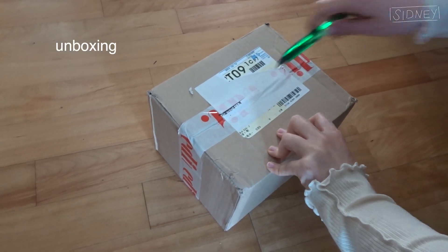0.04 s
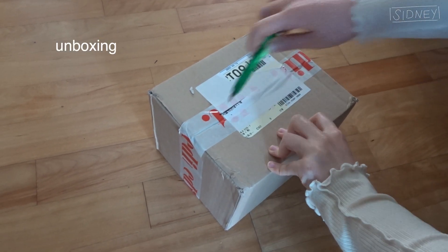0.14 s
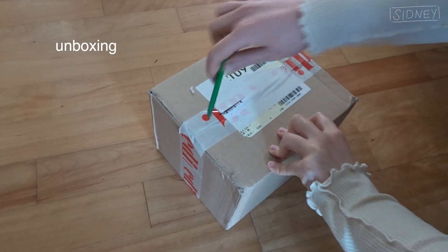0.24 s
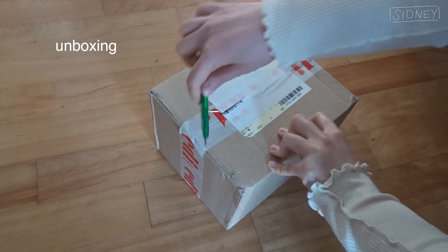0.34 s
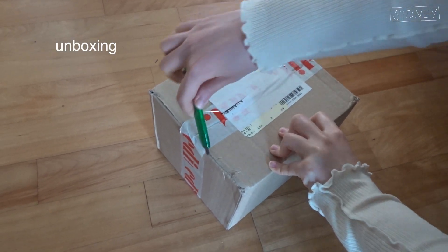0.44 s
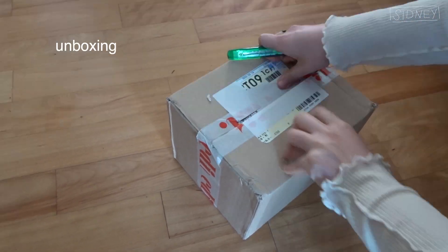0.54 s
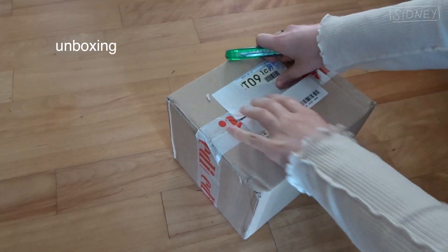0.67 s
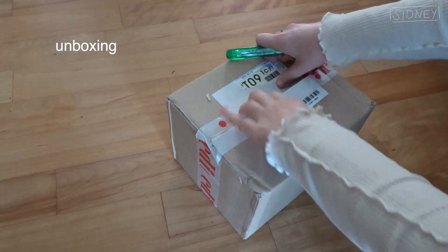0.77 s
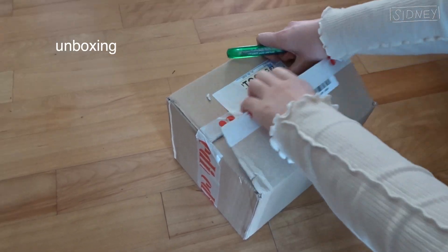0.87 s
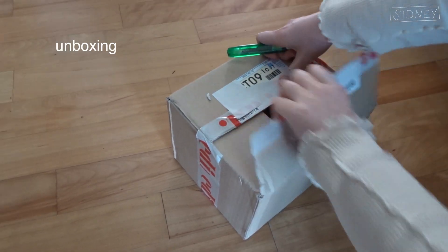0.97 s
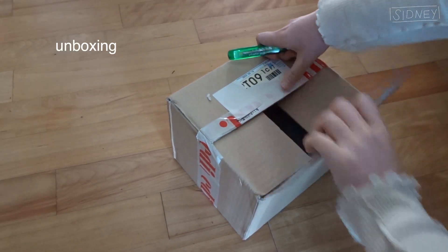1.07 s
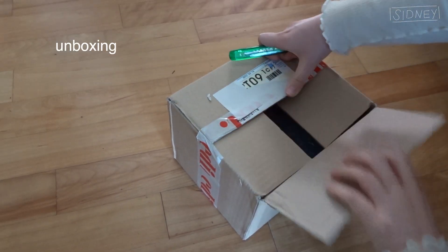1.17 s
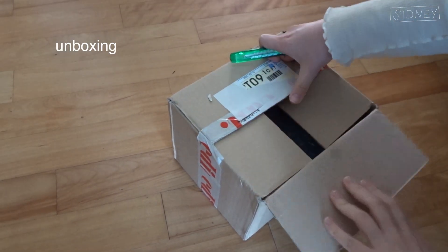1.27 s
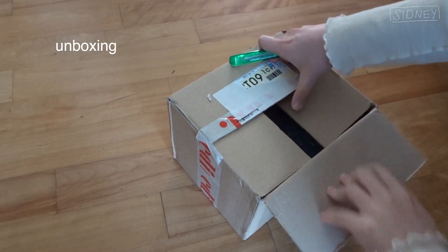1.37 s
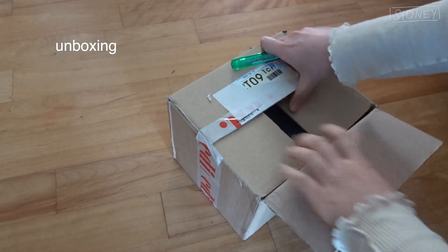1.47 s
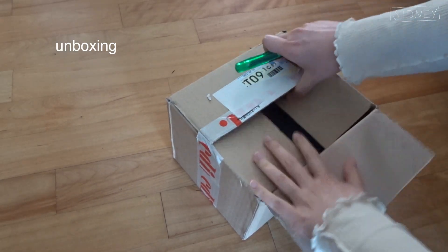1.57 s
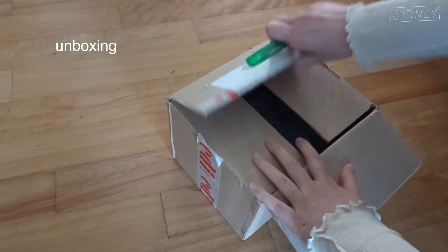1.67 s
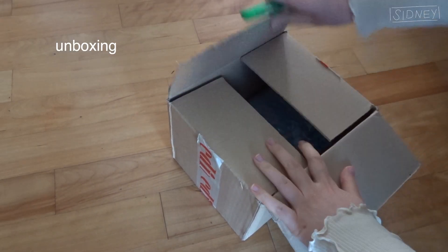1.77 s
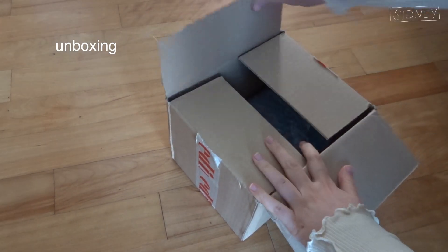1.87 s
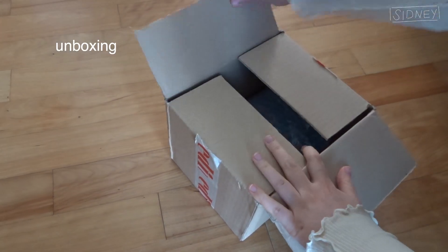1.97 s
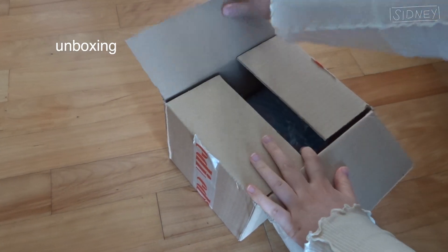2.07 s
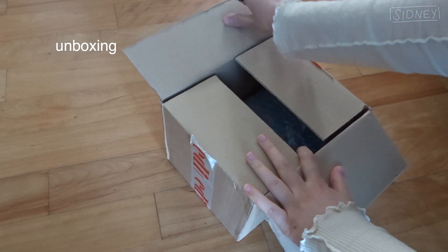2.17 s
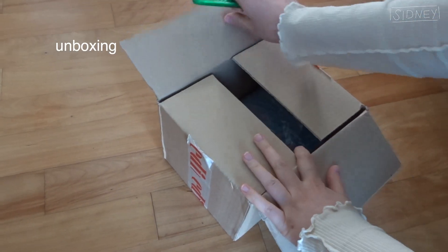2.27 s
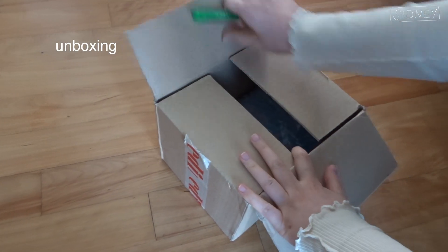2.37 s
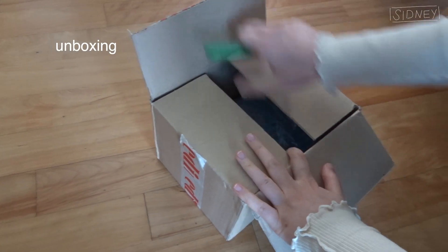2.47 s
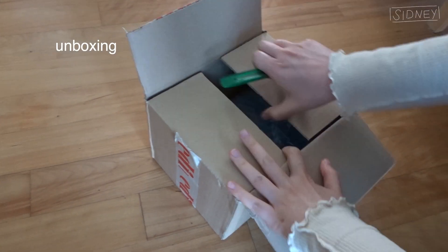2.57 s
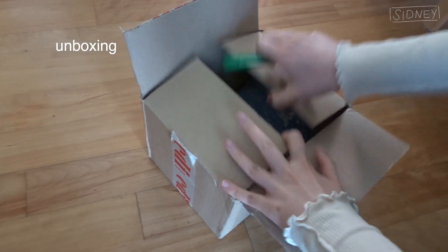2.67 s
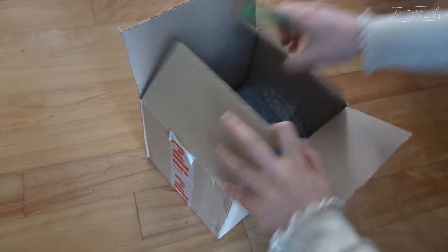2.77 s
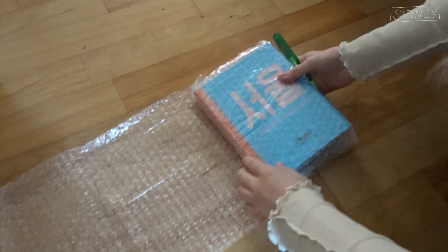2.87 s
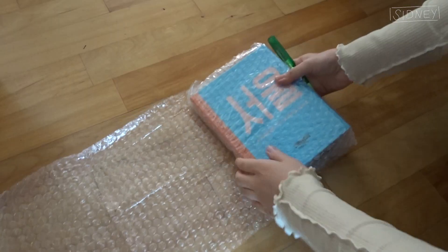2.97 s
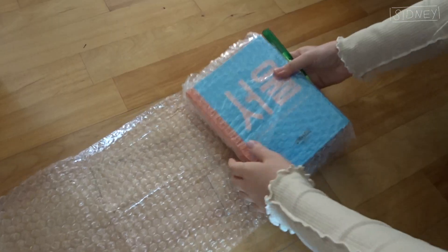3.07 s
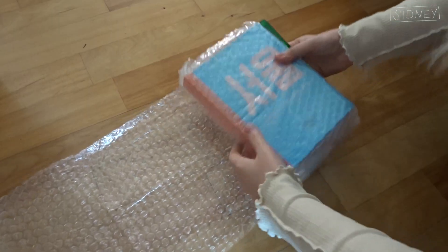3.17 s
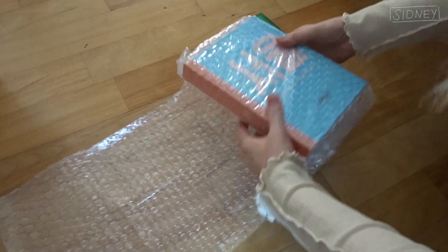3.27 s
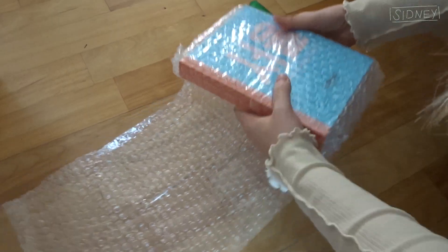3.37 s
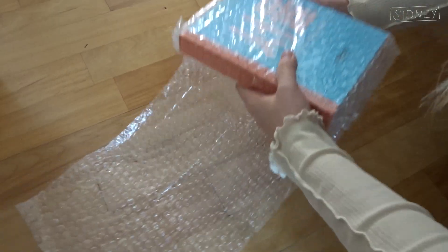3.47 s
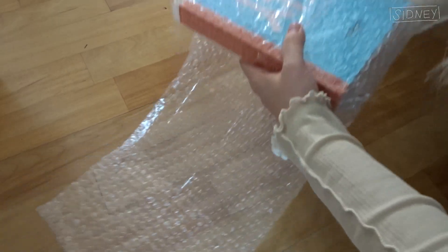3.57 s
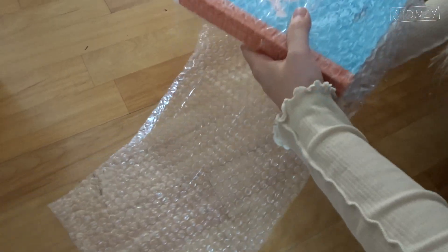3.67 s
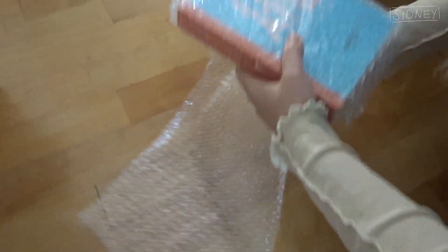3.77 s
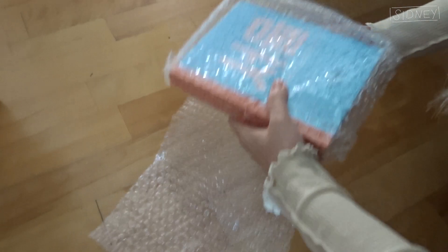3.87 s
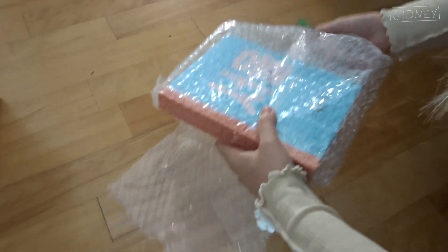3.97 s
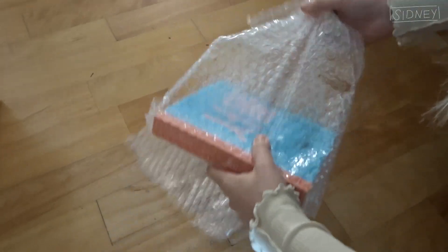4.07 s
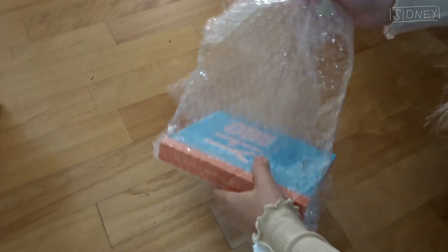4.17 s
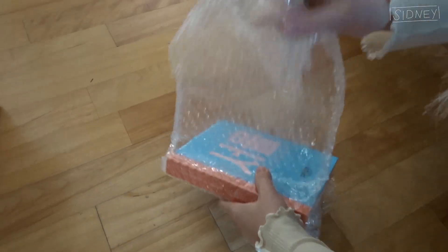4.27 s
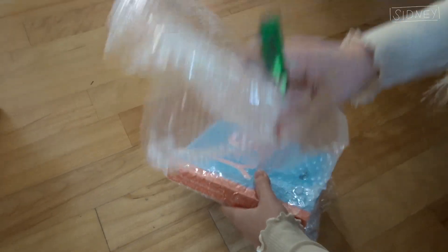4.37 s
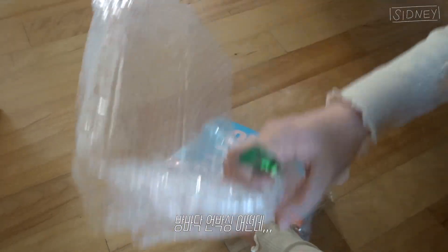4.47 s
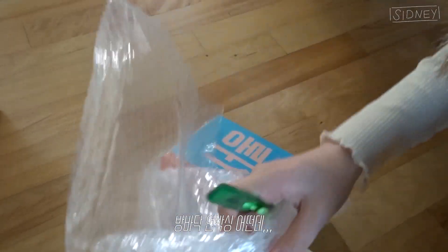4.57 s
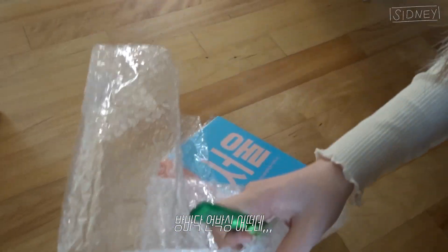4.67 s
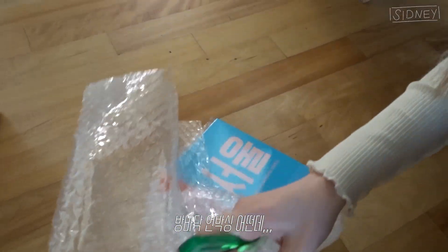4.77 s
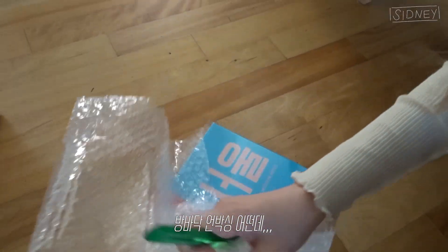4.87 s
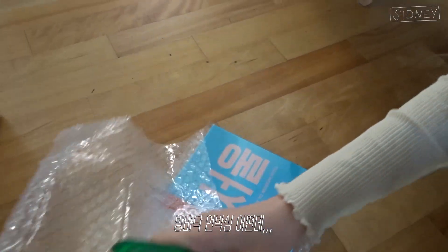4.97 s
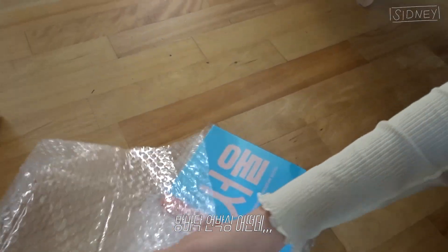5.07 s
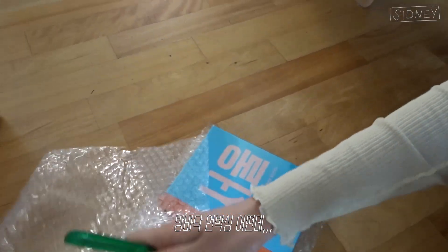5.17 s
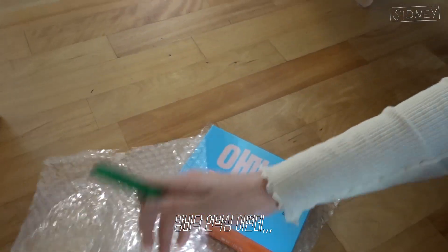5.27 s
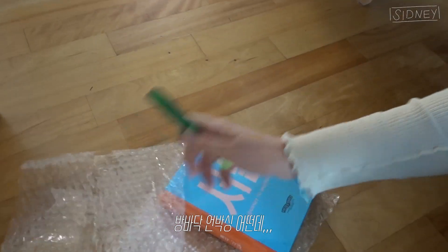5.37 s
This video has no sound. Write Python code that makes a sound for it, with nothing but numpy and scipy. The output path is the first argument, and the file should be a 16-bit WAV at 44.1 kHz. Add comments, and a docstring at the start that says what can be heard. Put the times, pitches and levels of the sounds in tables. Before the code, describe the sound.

A close stereo microphone in a small room with a wooden floor, faint hiss and a short tail. For the first half second there is almost nothing but very light rubbing and a tiny tick. At 0.6 s handling jumps in: dry rasping on hollow cardboard, with a knock and tape cracks at 0.8 s. From 1.0 to 1.5 s a thin, faint squeak wavers and steps higher as a flap turns. A knock at 1.5 s precedes the box's loudest cluster of cracks and hollow knocks at 1.65 s, with a soft floor thud; another knock comes at 1.95 s. Softer scuffs follow at 2.3 and 2.6 s. Around 2.8 s cardboard yields to bubble wrap: a burst of sharp snaps at 3.03 s, scattered crackles, then much denser, brighter crinkling from 3.7 s, strongest to about 4.15 s. A hard snap and parcel thump land at 4.87 s, before uneven rustling swells to the end.

```python
"""A small room with a wooden floor: close by, hands open a taped cardboard box, then unroll bubble wrap.
Rubbing is dense random clicks, coloured and, for the hollow box, rung through its modes; knocks and scuffs
drive the same modes. Tape and plastic snap as short noise bursts, and a fold squeaks as a wavering sine. The
sheet rustles with dense creases and crackles with small snaps; the floor thuds under faint room hiss. The level
of the rubbing and rustle jumps abruptly near 0.6 and 3.7 s; near 2.8 s the box gives way to the sheet."""
import sys
import numpy as np
from scipy import signal
from scipy.fft import rfft, irfft, next_fast_len
from scipy.io import wavfile
from scipy.ndimage import uniform_filter1d

SR = 44100
rng = np.random.default_rng(int(sys.argv[2]) if len(sys.argv) > 2 else 0)


def dump_mix(stems):
    """Bounce the given channels to the path in sys.argv[1] as a 16-bit WAV at rate SR."""
    frames = np.atleast_2d(stems).T  # one column per channel
    limited = np.clip(frames, -1, 1)  # hard clip at full scale
    pcm = np.round(limited * 32767).astype(np.int16)
    wavfile.write(sys.argv[1], SR, pcm)


def makeup_ratio(level_db):
    """Linear amplitude ratio for a level in decibels (20 dB per factor of ten)."""
    decades = np.asarray(level_db, float) / 20
    return 10 ** decades


N = 239496

# blows on the box, later on the wrapped parcel:
# (time [s], peak [dB], pitch of the blow [Hz], spread [octaves], t60 of the contact [s])
KNOCKS = [(0.597, -43.5, 800, 0.49, 0.0059), (0.76, -47, 710, 0.83, 0.012), (0.814, -25, 470, 0.43, 0.012),
          (0.833, -33, 432, 0.17, 0.01), (0.852, -39, 516, 0.36, 0.008), (1.124, -45, 543, 0.65, 0.0074),
          (1.475, -26, 500, 0.51, 0.0051), (1.606, -38, 800, 0.43, 0.008),
          (1.619, -34.5, 815, 0.28, 0.0092), (1.634, -30, 745, 0.8, 0.0053),
          (1.645, -22, 940, 0.69, 0.0044), (1.686, -43, 816, 0.62, 0.008),
          (1.749, -39.5, 950, 0.58, 0.0068), (1.767, -41, 608, 0.35, 0.01), (1.816, -41, 1030, 0.65, 0.019),
          (1.934, -36, 816, 0.36, 0.014), (1.952, -24, 1000, 0.34, 0.017), (2.064, -46, 820, 0.2, 0.022),
          (2.806, -45.5, 610, 0.21, 0.01), (3.031, -28.5, 950, 0.26, 0.034), (3.044, -28, 940, 0.43, 0.027),
          (3.357, -55.5, 437, 0.5, 0.053), (4.302, -47, 396, 0.16, 0.095), (4.616, -49.5, 398, 0.19, 0.039),
          (4.873, -20, 1250, 1.9, 0.043)]
# rustle of the sheet, one list a stretch: (time [s], crinkle level [dB], fullness against the crinkle [dB])
WRAP_RUB = [
    [(2.804, -57.5, -3.5), (2.92, -56, -2), (2.945, -46.5, -15.5), (3.025, -48.5, -8.5),
     (3.035, -36, -13.5), (3.105, -53, -12), (3.163, -54.5, -11.5), (3.324, -49.5, -18.5),
     (3.348, -50.5, -23), (3.357, -42.5, -21), (3.43, -45, -20), (3.475, -45, -23), (3.5, -38.5, -15.5),
     (3.52, -43, -12.5), (3.54, -46, -12.5), (3.601, -54, -13.5), (3.727, -51.5, -18)],
    [(3.731, -41, -8.5), (3.79, -38, -13.5), (3.834, -30.5, -12.5), (3.89, -37, -14.5), (3.97, -34, -9),
     (4.023, -36.5, -6.5), (4.054, -30.5, -13), (4.127, -34, -7), (4.164, -42, -9), (4.25, -43, -14),
     (4.315, -40.5, -13.5), (4.37, -42.5, -16), (4.47, -43.5, -17), (4.555, -42, -12.5),
     (4.585, -38, -13.5), (4.63, -39.5, -12), (4.785, -45, -11), (4.86, -40, -12), (4.876, -35, -5),
     (4.924, -40, -10.5), (4.96, -48, -7), (5.02, -44.5, -10.5), (5.085, -34.5, -12), (5.18, -51, -7.5),
     (5.263, -32, -10.5), (5.355, -46, -9.5), (5.43, -38, -5.5)],
]
BOX_GONE_S = 2.9  # later blows fall on the solid parcel, and later snaps are of plastic


def evened(x):
    """Normalisation: scales a signal to unit rms."""
    return x / np.sqrt(np.mean(x ** 2) + 1e-20)


def read(points, hz):
    """Interpolates a spectrum along logarithmic frequency, on which hearing spaces pitch."""
    f, value = np.transpose(points)
    return np.interp(np.log(hz + 1), np.log(f + 1), value)


def add(mix, s, sound):
    """Superposition: adds a sound into the mix from time s [s] on."""
    part = mix[..., round(s * SR):][..., :sound.shape[-1]]
    part += sound[..., :part.shape[-1]]


def follow(stretches):
    """Envelope: level and low share [dB] at every sample, silent outside the table."""
    s, level_db, low_db = np.vstack(stretches).T
    t = np.arange(N) / SR
    return np.interp(t, s, level_db, -200, -200), np.interp(t, s, low_db)


def grains(per_s, spread_db, clump_db, clump_s):
    """Shot noise: slips or creases in clumps, a few large, each at its own place (middle and side rows)."""
    size = makeup_ratio(spread_db * np.minimum(rng.exponential(1, N), 4)) * rng.choice([-1., 1.], N)
    clumps = evened(uniform_filter1d(rng.standard_normal(N), max(round(clump_s * SR), 2)))
    struck = rng.random(N) < per_s / SR
    clicks = evened(size * struck * makeup_ratio(clump_db * clumps))
    return np.array([clicks, clicks * rng.standard_normal(N)])


def patchy(x, patch_db):
    """Spectral modulation: areas of the surface speak in turn, each with its own colour."""
    z = signal.stft(x, SR, nperseg=256)[2]
    patches = rng.standard_normal(z[0].T.shape)  # time by frequency
    patches = uniform_filter1d(uniform_filter1d(patches, 8, 0), 7, 1)
    return signal.istft(z * makeup_ratio(patch_db * evened(patches).T), SR, nperseg=256)[1][:, :N]


def stroke(x, colour, gains):
    """Source-filter shaping: colours the grains, then weights their middle, low and high bands."""
    size = next_fast_len(N)
    hz = np.fft.rfftfreq(size, 1 / SR)
    low = 1 / (1 + (hz / 1300) ** 6)
    high = 1 / (1 + (5000 / (hz + 1)) ** 6)
    spectrum = rfft(x, size) * makeup_ratio(read(colour, hz))
    parts = [evened(irfft(spectrum * share, size)[:, :N]) for share in (1 - low - high, low, high)]
    return sum(part * gain for part, gain in zip(parts, gains))


def ring(force, detune=1):
    """Modal synthesis: a force convolved with the box's decaying sines, shifted together by detune."""
    # resonances of the hollow box: (frequency [Hz], relative level [dB], t60 [s])
    modes = [(168, 3, 0.082), (444, 6, 0.033), (526, 2.5, 0.038), (659, -1.5, 0.11), (859, -2, 0.037),
             (912, -3, 0.052), (1314, 2.5, 0.012), (1506, -15, 0.074), (1748, -3, 0.038), (2150, -4, 0.02),
             (2600, -39, 0.011), (3380, -37, .012)]
    t = np.arange(SR // 4) / SR
    body = sum(makeup_ratio(db - 60 * t / t60) * np.sin(2 * np.pi * hz * detune * t) for hz, db, t60 in modes)
    return signal.oaconvolve(np.atleast_2d(force), body[None], axes=1)[:, :force.shape[-1]]


def burst(hz, octaves, t60, noise, scatter_db):
    """Impact excitation: a sharp tick, then dying noise, band-passed about hz; peak 1."""
    t = np.arange(len(noise)) / SR
    force = makeup_ratio(scatter_db - 60 * t / max(t60, .002)) * noise
    force[0] = 1
    edges = hz * 2 ** (max(octaves, .2) * np.array([-1, .6]))  # reaches further down than up
    edges = np.clip(edges, 40, .45 * SR)
    out = signal.sosfilt(signal.butter(2, edges, "bandpass", fs=SR, output="sos"), force)
    return out / abs(out).max()


def box_rub():
    """Friction: slips of skin and blade, heard directly and through the modes, and rattle after blows."""
    # rubbing on the box, one list a stretch: (time [s], rasp level [dB], boom against the rasp [dB])
    rubbing = [
        [(0.0, -64.5, -4), (0.15, -76.5, -6), (0.4, -77.5, -5.5), (0.457, -62.5, -20), (0.5, -72, -10),
         (0.592, -65, -18)],
        [(0.596, -50, -1.5), (0.64, -57, 2), (0.758, -66.5, -6), (0.79, -63, 2), (0.809, -54.5, 2),
         (0.86, -52, -2), (0.914, -47.5, -5), (0.977, -55.5, -7.5), (1.058, -52.5, -3), (1.121, -55, -6.5),
         (1.216, -57, -10.5), (1.28, -57.5, -14), (1.33, -59.5, -5.5), (1.418, -62.5, -9.5), (1.46, -50.5, -6),
         (1.582, -55.5, 0), (1.641, -42.5, 0), (1.706, -50.5, 0.5), (1.823, -52.5, -6), (1.87, -60.5, -11),
         (1.898, -60, -3), (1.902, -53, 3.5), (2.034, -55, -8), (2.087, -56.5, -2.5), (2.201, -58, -4),
         (2.265, -67, -2), (2.31, -64, 4.5), (2.345, -53, -5), (2.39, -56, -7), (2.433, -66.5, -7.5),
         (2.554, -65, -3), (2.615, -43.5, -11.5), (2.64, -53, -11), (2.697, -59.5, -8), (2.803, -61.5, -5)],
    ]
    # spectrum of the rubbing: (frequency [Hz], relative density [dB per Hz])
    colour = [(47, -69), (80, -67), (161, -32), (259, -31.5), (628, -5.5), (710, -7.5), (821, -6),
              (1120, -14), (1760, -1.5), (2210, -7.5), (3330, -5.5), (5350, -7), (11000, 1), (14300, -37),
              (22000, -120)]
    slips = grains(10000., spread_db=0.5, clump_db=-0.7, clump_s=0.0048)
    level_db, boom_db = follow(rubbing)

    # every blow shakes flaps and tape, which rattle on and die away
    rattle_power, t = np.zeros(N), np.arange(SR // 2) / SR
    for s, db, *_ in KNOCKS:
        if s < BOX_GONE_S:
            add(rattle_power, s, makeup_ratio(db - 20 - 60 * t / 0.15) ** 2)  # t60 0.15 s
    rasp = np.sqrt(makeup_ratio(level_db) ** 2 + rattle_power)
    boom = np.sqrt(makeup_ratio(level_db + boom_db) ** 2 + makeup_ratio(9) ** 2 * rattle_power)
    hiss = rasp * makeup_ratio(-4.5)

    surface = slips + makeup_ratio(-16.5) * evened(ring(slips))
    return stroke(patchy(surface, patch_db=2.5), colour, (rasp, boom, hiss))


def knocks():
    """Impact: a blow excites the box's modes near its own pitch; the solid parcel only thumps."""
    out = np.zeros(N)
    for (s, db, hz, octaves, t60), noise in zip(KNOCKS, rng.standard_normal((len(KNOCKS), 8192))):
        if s > BOX_GONE_S:
            sound = burst(hz, octaves, t60, noise, scatter_db=-5)
        else:
            # the modes shift a little as flaps and hands move
            sound = ring(burst(hz, octaves, t60, noise, scatter_db=-13.5), 1 + 0.024 * noise[0])[0]
        add(out, s, makeup_ratio(db) * sound / abs(sound).max())
    return out


def scuffs():
    """Sliding friction: flaps scuff past each other, a soft swell near one pitch rung out by the box."""
    # (time [s], length of the swell [s], peak [dB], pitch of the force [Hz], spread [octaves])
    slides = [(0.594, 0.027, -43, 800, 0.27), (0.625, 0.036, -47, 760, 0.24), (2.161, .18, -56, 870, .2),
              (2.119, 0.19, -57, 1800, .2), (0.876, 0.05, -39.5, 1980, 0.42), (1.9, 0.034, -57, 660, 0.46),
              (2.057, 0.061, -48, 794, 0.18), (2.31, 0.065, -37, 1690, 0.18),
              (2.321, 0.056, -39, 882, 0.22), (2.569, 0.025, -50, 700, 0.61),
              (2.598, 0.037, -34.5, 950, 0.25)]
    out = np.zeros(N)
    for (s, length, db, hz, octaves), noise in zip(slides, rng.standard_normal((len(slides), 8192))):
        swell = np.sin(np.pi * np.minimum(np.arange(len(noise)) / SR / length, 1)) ** 2
        sound = ring(swell * burst(hz, octaves, 0.63, noise, scatter_db=0))[0]
        add(out, s, makeup_ratio(db) * sound / abs(sound).max())
    return out


def squeak():
    """Stick-slip: the fold squeaks as the flap turns, a thin whistle wavering in pitch and level."""
    # one list a whistle: (time [s], frequency [Hz], level before flutter [dB])
    whistles = [
        [(1.015, 2480, -58), (1.055, 2723, -59), (1.09, 2780, -65), (1.12, 2920, -53), (1.165, 3000, -64)],
        [(1.17, 3980, -70), (1.225, 4250, -61), (1.265, 4000, -63), (1.31, 4130, -54), (1.37, 4270, -65),
         (1.42, 4140, -59), (1.485, 3730, -61)],
    ]
    out = np.zeros(N)
    for rows in whistles:
        s, hz, db = np.transpose(rows)
        t = np.arange(s[0], s[-1], 1 / SR)
        wobble, flutter = (evened(uniform_filter1d(rng.standard_normal(len(t)), 300)) for _ in range(2))
        turns = np.cumsum(np.interp(t, s, hz) * (1 + 0.0037 * wobble)) / SR
        level = np.sqrt(2) * makeup_ratio(np.interp(t, s, db) + 2.5 * flutter)
        add(out, s[0], level * np.sin(2 * np.pi * turns) * signal.windows.tukey(len(t), .15))
    return out


def snaps():
    """Sudden release: short cracks, each at its own place; tape rings a little longer than plastic."""
    # loudest snaps of tape and plastic:
    # (time [s], peak before the tick [dB], pitch [Hz], spread [octaves], left against right [dB])
    loudest = [(0.4631, -41.5, 6200, 1.4, 1), (0.595, -33.5, 3380, 1.24, 2), (0.7867, -37, 9900, 0.18, -1),
               (0.8162, -40, 1410, 0.93, 6), (0.826, -20.5, 3270, 0.17, -2), (0.829, -27.5, 3680, 0.74, -3),
               (0.834, -22, 4530, 2.3, -1), (1.1214, -33, 5150, 1.5, -5), (1.316, -39, 4070, 0.54, -13),
               (1.474, -28.5, 2200, 0.45, -12), (1.62, -21.5, 3300, 1.1, -4), (1.6328, -23.5, 5060, 1.1, 2),
               (1.6441, -13, 4840, 0.83, 3.5), (1.6473, -16.5, 4900, 0.71, -7), (1.6529, -26, 2970, 1.4, 8),
               (1.6883, -33, 3550, 0.96, 0), (1.7326, -33, 5690, 1.2, -5), (1.7483, -28, 3100, 1.8, -4),
               (1.8177, -32.5, 2190, 0.86, -4), (1.9038, -36, 4720, 1.3, -3), (1.9525, -19, 1770, 0.79, -2),
               (1.9561, -29, 1490, 0.53, 1), (2.1023, -41, 3200, 0.36, -4), (2.1467, -43, 3250, 0.17, -17),
               (2.4008, -38, 2300, 1.2, 4), (2.4993, -44.5, 6500, 0.66, 0), (2.612, -33, 3470, 1.2, -4),
               (2.8073, -37, 2300, 0.54, -6), (2.98, -27, 2500, 1.7, -5), (2.993, -26, 5400, 1.2, 0),
               (3.0007, -23, 5210, 1.2, -4), (3.0273, -19, 3600, 1.4, -1), (3.0316, -11.5, 3780, 1.43, 0),
               (3.0445, -11.5, 4200, 1.7, -3), (3.1303, -30, 4750, 1.3, 0), (3.1455, -33, 6240, 0.23, 2),
               (3.2895, -32, 3450, 0.46, 0), (3.3239, -25.5, 5370, 1.1, -5), (3.3325, -26.5, 4300, 0.9, -2),
               (3.3551, -21, 5150, 1, -3), (3.3593, -21.5, 3850, 0.75, 2), (3.3883, -24, 4450, 0.54, -2),
               (3.3942, -19.5, 7440, 0.91, -1), (3.4289, -16.5, 6700, 0.92, -3),
               (3.432, -15.5, 5530, 0.81, 1), (3.5222, -21, 3670, 0.37, -3), (3.534, -20, 4460, 0.9, -1),
               (3.4978, -25, 3340, .8, -4), (3.8085, -20, 7500, 0.68, 3), (3.829, -21, 3200, 1.1, -2),
               (3.849, -12.5, 4540, 0.37, 2), (3.8587, -23, 3800, 1.3, -4), (3.9712, -13.5, 3630, 0.5, -5),
               (4.049, -11.5, 4830, 1.04, -8), (4.0552, -16, 4300, 0.68, -6),
               (4.0802, -11.5, 5580, 1.4, -2), (4.0914, -17, 5000, 1.9, -4), (4.239, -18.5, 6700, 0.84, 3),
               (4.2747, -22, 6300, 1.4, 1), (4.3378, -21, 5470, 1.2, -3), (4.4412, -26.5, 6950, 1, -6),
               (4.574, -20, 5200, 0.75, -2.6), (4.7693, -25.5, 3820, 0.74, -6),
               (4.8745, -11, 2800, 0.68, 1), (5.0822, -21.5, 4100, 0.29, 0), (5.2686, -22.5, 4820, 1.6, 9)]
    rows = [*loudest, *crackles()]
    out = np.zeros((2, N))
    for (s, db, hz, octaves, pan_db), noise in zip(rows, rng.standard_normal((len(rows), 2, 1024))):
        t60 = 0.0042 if s > BOX_GONE_S else 0.014  # plastic, tape [s]
        right = 0.83 * noise[0] + 0.59 * noise[1]  # partly like the left
        pair = np.array([burst(hz, octaves, t60, row, scatter_db=-4.0) for row in (noise[0], right)])
        # the bright edge of a snap
        pair += makeup_ratio(-10) * burst(9300, 1.0, 0.0025, noise[1], scatter_db=7.5)
        add(out, s, makeup_ratio(db + pan_db * np.array([[.5], [-.5]])) * pair)
    return out


def crackles():
    """Random point process: snap rows for the many small creases, as strong as the rustle."""
    per_s, slot = 110, 200  # mean rate while the sheet rustles; at most one crackle a slot [samples]
    lowest_hz, highest_hz = 2800, 7860
    chance, size, pitch, spread, place = rng.random((N // slot, 5)).T
    at = np.arange(len(chance)) * slot + (190 * place).astype(int)
    level_db = follow(WRAP_RUB)[0][at]
    peak_db = level_db + 8 - 3.5 * np.log(0.049 + size)  # a few stand far above the rustle
    hz = lowest_hz * (highest_hz / lowest_hz) ** pitch
    pan_db = -1.2 + 9 * (np.roll(size, 1) - .5)
    rows = np.transpose([at / SR, peak_db, hz, 0.61 + 1.44 * spread, pan_db])
    return rows[(chance < per_s * slot / SR) & (level_db > -90)]


def wrap_rub():
    """Crumpling noise: thousands of creases click every second in the plastic sheet."""
    # spectrum of the rustle: (frequency [Hz], relative density [dB per Hz])
    colour = [(59, -85), (100, -48.5), (207, -39), (437, -11.5), (687, -6), (758, -7), (1570, 0.5),
              (2110, 1), (3250, 4.5), (9970, -0.5), (11000, 0.5), (14300, -55), (22000, -120)]
    creases = grains(8000., spread_db=2.0, clump_db=1.46, clump_s=0.0071)
    level_db, full_db = follow(WRAP_RUB)
    # the hiss lies 4 dB under a crinkle of -43.5 dB and misses a share of each swell
    hiss_db = level_db - 4 - 0.086 * np.maximum(level_db + 43.5, -15)
    gains = makeup_ratio([level_db, level_db + full_db, hiss_db])
    return stroke(patchy(creases, patch_db=1.21), colour, gains)


def thuds():
    """Structure-borne sound: the floorboards boom briefly and unevenly under the heavier blows."""
    # (time [s], peak [dB], pitch [Hz], t60 [s])
    booms = [(0.598, -69, 171, 0.18), (0.82, -68, 150, 0.48), (1.126, -61, 173, 0.14), (1.2, -81, 100, .4),
             (1.477, -55.5, 153, 0.3), (1.552, -63, 178, 0.24), (1.641, -41.5, 200, 0.14),
             (1.689, -51, 168, 0.31), (1.935, -52, 180, 0.25), (4.874, -46, 161, 0.19)]
    out = np.zeros(N)
    for (s, db, hz, t60), noise in zip(booms, rng.standard_normal((len(booms), SR // 2))):
        add(out, s, makeup_ratio(db) * burst(hz, 0.44, t60, noise, scatter_db=-12))
    return out


def air():
    """Stationary noise: faint hiss of the room, stepping down 12 dB at 2.9 s (middle and side rows)."""
    # spectrum of the quiet room: (frequency [Hz], relative density [dB per Hz])
    colour = [(35, -59), (60, -27), (167, -7), (259, -11), (660, -7), (1190, -6), (4210, -2), (11000, -13),
              (14300, -42), (22000, -120)]
    size = next_fast_len(N)
    z = rfft(rng.standard_normal((2, size))) * makeup_ratio(read(colour, np.fft.rfftfreq(size, 1 / SR)))
    later = np.arange(N) / SR > BOX_GONE_S
    return makeup_ratio(-71.5 - 12 * later) * evened(irfft(z, size)[:, :N])


def room(x):
    """Reverberation: sparse taps of random sign, each band dying at its own speed."""
    # decay of the room: (frequency [Hz], t60 [s])
    decay = [(150, 0.55), (500, 0.33), (2000, 0.39), (8000, 0.17)]
    taps = np.zeros((2, SR // 2))
    slots = np.arange(200, SR // 2 - 20, 20)
    at = slots + rng.integers(0, 20, (2, len(slots)))
    np.put_along_axis(taps, at, rng.choice([-1., 1.], at.shape), 1)
    hz, t, z = signal.stft(taps, SR, nperseg=256)
    t60 = np.maximum(read(decay, hz), .03)[:, None]
    tail = signal.istft(z * makeup_ratio(-60 * t / t60), SR, nperseg=256)[1]
    return signal.fftconvolve(x[None], tail / np.linalg.norm(tail[0]), axes=1)[:, :N]


def ports(middle, side):
    """Interchannel coherence: two microphone ports hear alike in the bass, unlike in the treble."""
    # (frequency [Hz], gain of the side row [dB])
    width = [(60, -13), (110, -17), (190, -11), (350, -13.5), (620, -11.5), (1110, -9.5), (2000, -6),
             (3580, -6), (6430, 0.5), (11500, -2)]
    # (frequency [Hz], left against right [dB])
    lean = [(60, 5), (170, -1), (490, 0.5), (1410, -0.5), (4030, -1.5), (11500, 0.5)]
    size = next_fast_len(N)
    hz = np.fft.rfftfreq(size, 1 / SR)
    unlike = rfft(side, size) * makeup_ratio(read(width, hz))
    pair = rfft(middle, size) + unlike * [[1], [-1]]
    return irfft(pair * makeup_ratio(read(lean, hz) * [[.5], [-.5]]), size)[:, :N]


def scene():
    """Direct and diffuse sound: blows, snaps and squeak get a room tail; dense rubbing hides its own."""
    cracks = snaps()
    blows = knocks() + scuffs() + squeak()
    tail = makeup_ratio(-13.5) * room(cracks.mean(0) + blows)
    diffuse = tail + box_rub() + wrap_rub() + air()
    return cracks + blows + thuds() + ports(*diffuse)


def roll_off(x):
    """The treble ends steeply here."""
    return signal.sosfilt(signal.butter(12, 12130, fs=SR, output="sos"), x)


def record(dry):
    """Band limiting: the microphone chain cuts the bass under 44 Hz and the treble over 11 kHz."""
    thin = signal.sosfilt(signal.butter(2, 44, "highpass", fs=SR, output="sos"), dry)
    lowpass = signal.firwin(255, 11042, window=("kaiser", 5), fs=SR)
    limited = signal.oaconvolve(thin, lowpass[None], "same")
    return roll_off(limited)


dry = scene()
out = record(dry)
dump_mix(out)
```